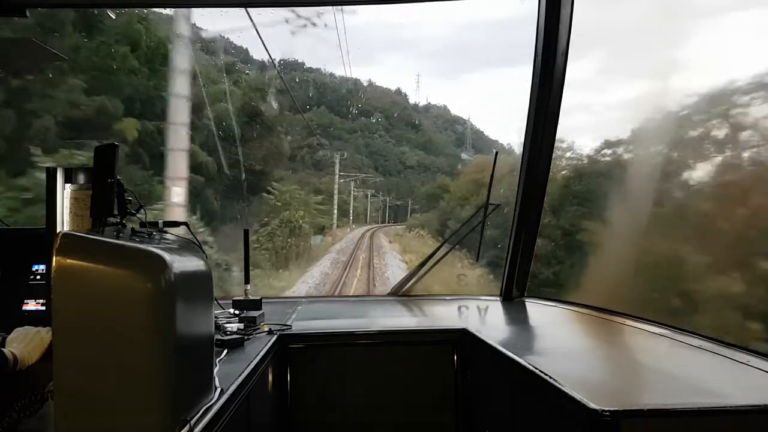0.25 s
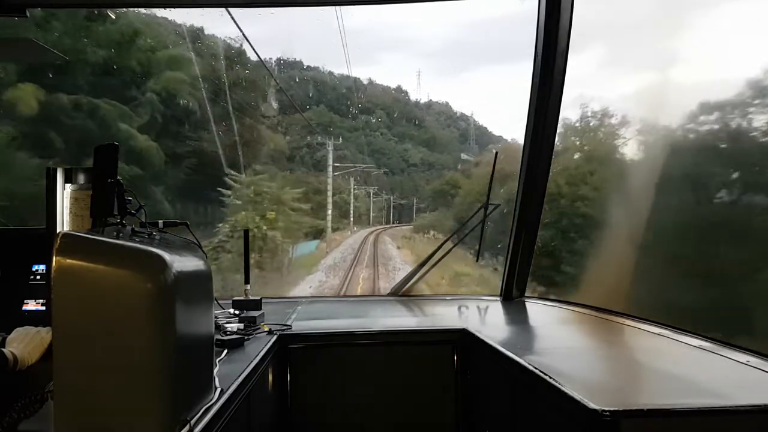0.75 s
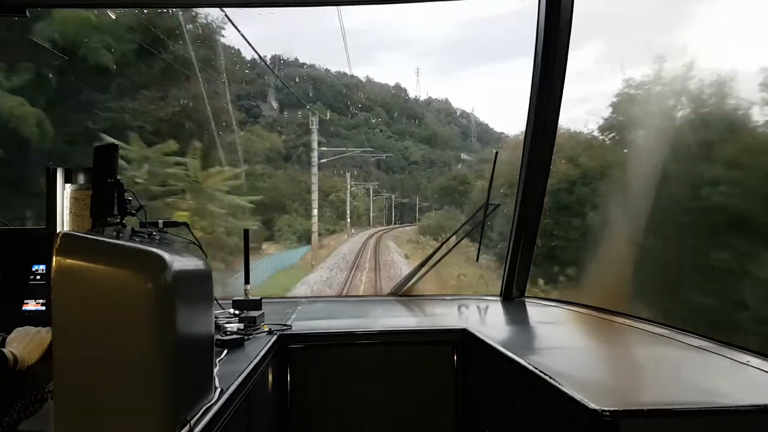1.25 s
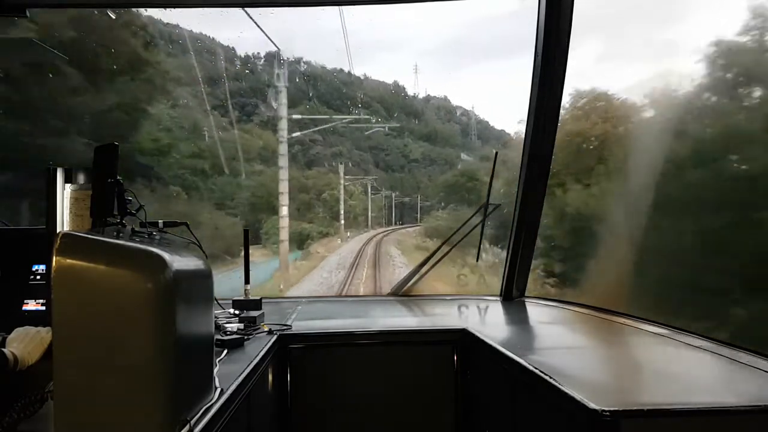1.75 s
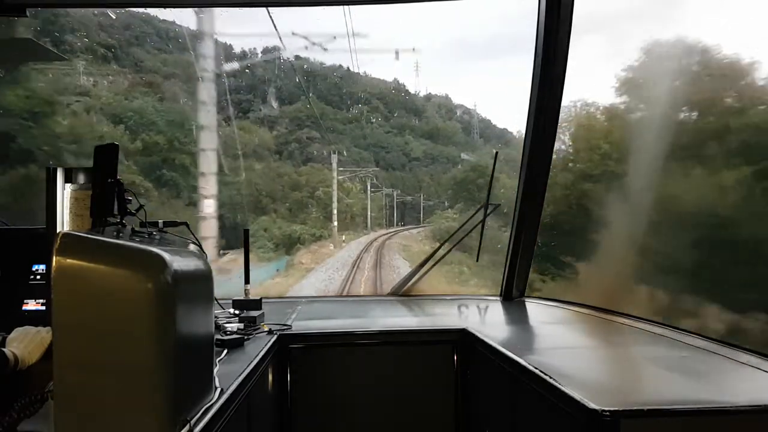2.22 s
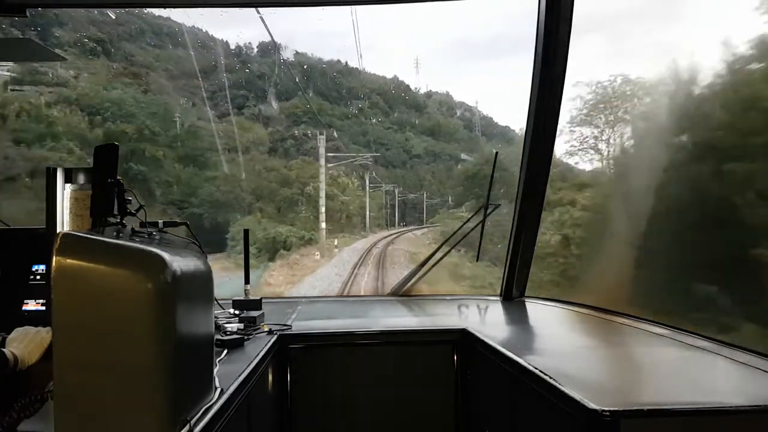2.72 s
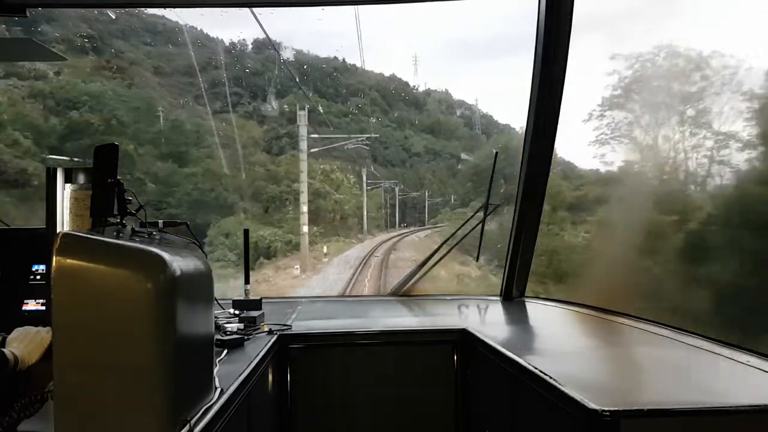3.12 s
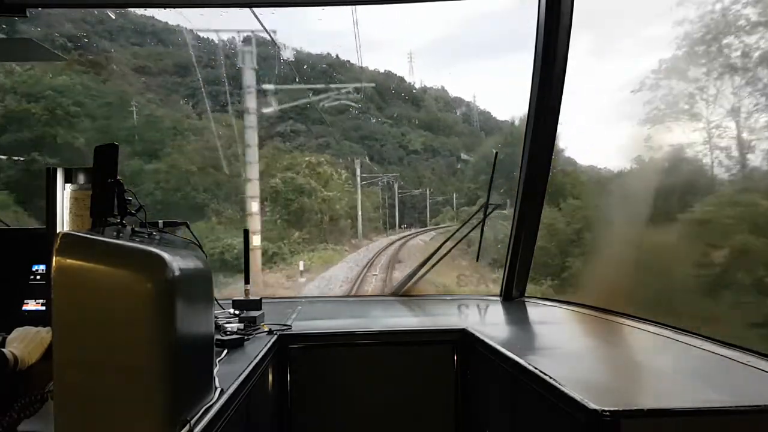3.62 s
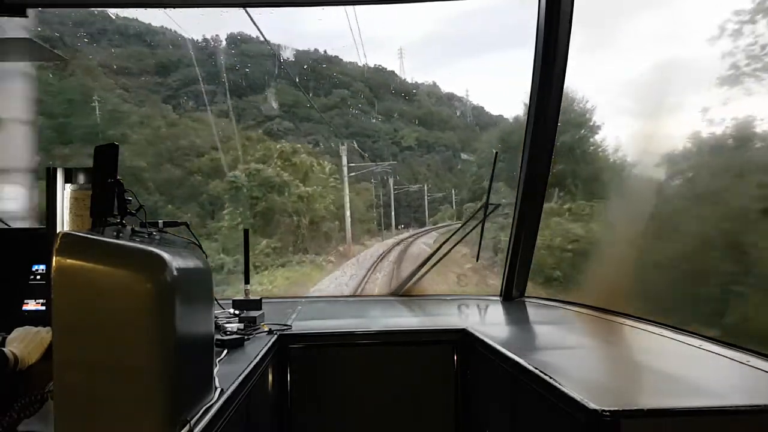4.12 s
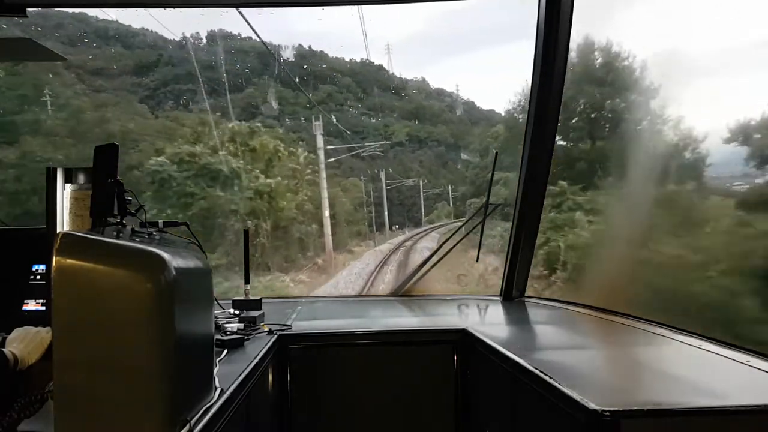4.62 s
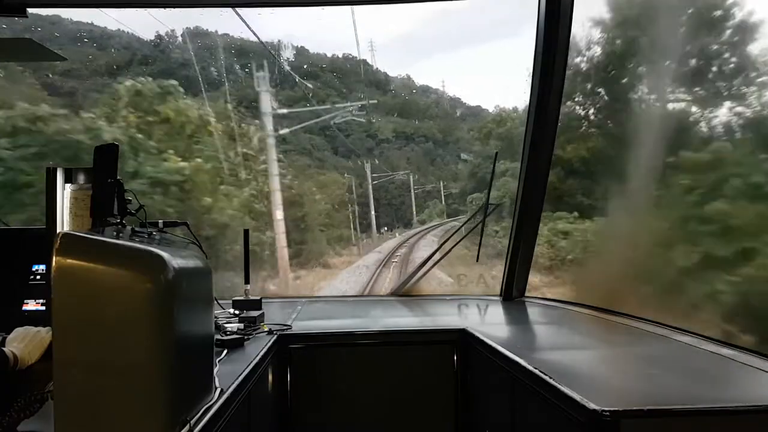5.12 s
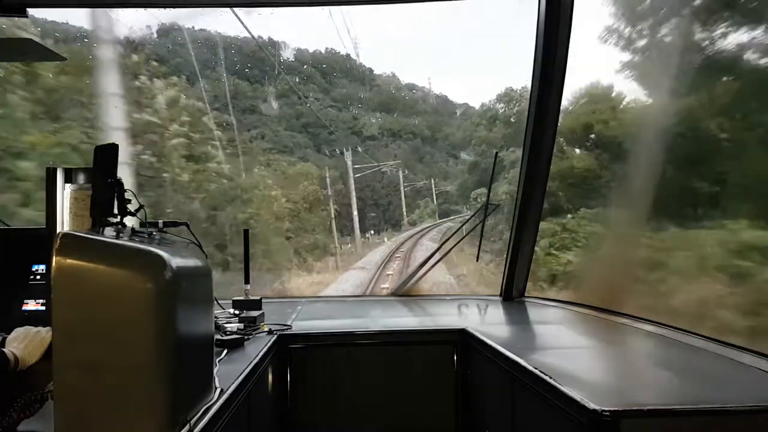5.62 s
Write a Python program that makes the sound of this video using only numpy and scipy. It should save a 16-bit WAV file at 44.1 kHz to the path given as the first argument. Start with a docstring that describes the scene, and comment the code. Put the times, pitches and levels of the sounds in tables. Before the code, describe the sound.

Steady low rumble of wheels on rail inside a moving train's cab, broken by small clicks, brief rattles and several heavy thuds.

```python
"""A low rumble and a rush of air fill the front car of an electric train at speed, under a thin whine.
Rail roughness drives the resonances of floor and wheels. Hiss puffs, loose parts clatter, a fitting
ticks, and wheelsets thud over joints, each blow ringing damped modes. Now and then a flange squeals;
once a wheel sings, and once the car body bottoms with a deep thump."""
import sys
import numpy as np
from scipy import signal
from scipy.fft import rfft, irfft, next_fast_len
from scipy.io import wavfile
from scipy.ndimage import uniform_filter1d, map_coordinates

SR = 44100
rng = np.random.default_rng(int(sys.argv[2]) if len(sys.argv) > 2 else 0)


def transcribe(signal):
    """Save signal, clipped to [-1, 1], as a 16-bit WAV file at the path in sys.argv[1]."""
    frames = np.atleast_2d(signal).T
    limited = np.clip(frames, -1, 1)
    pcm = np.round(limited * 32767).astype(np.int16)
    wavfile.write(sys.argv[1], SR, pcm)


N = 258426


def amp(db):
    return 10 ** (np.asarray(db) / 20)

def unit(x):
    return x / np.sqrt(np.mean(x ** 2) + 1e-20)

def along(points, hz):
    """Interpolate (Hz, value) points on a log frequency axis."""
    f, v = np.transpose(points)
    return np.interp(np.log(hz + 1), np.log(f + 1), v)

def curves(rows):
    """Interpolate each column after the time to one value per sample."""
    s, *cols = np.transpose(rows)
    return [np.interp(np.arange(N) / SR, s, c) for c in cols]

def wobble(rate):
    """Smooth random modulation, rate knots a second."""
    return map_coordinates(rng.standard_normal(int(N * rate / SR) + 4), [np.arange(N) * rate / SR])

def filtered(x, response):
    """Linear filtering: the spectrum of x times a frequency response."""
    m = next_fast_len(x.shape[-1] + SR // 4)
    return irfft(rfft(x, m) * response(np.fft.rfftfreq(m, 1 / SR)), m)[..., :x.shape[-1]]

def resonance(table, f):
    """Magnitude response of damped resonators, summed in power."""
    return np.sqrt(sum(amp(db) ** 2 * (f * width) ** 2 / ((hz * hz - f * f) ** 2 + (f * width) ** 2)
                       for hz, width, db in table))

def add(out, s, sound):
    """Superpose a short sound at s seconds."""
    part = out[:, round(s * SR):][:, :sound.shape[-1]]
    part += sound[..., :part.shape[1]]

# Coherence of the sound field. Each row: frequency in Hz, left-right correlation.
COHERENCE = [(25, .96), (70, .93), (125, .92), (250, .78), (500, .42), (1000, .3), (2000, .35), (5000, .15),
             (12000, .18)]
def noise(gain, patchy_db):
    """Partly coherent stereo noise of rms 1, its gain patchy in time and frequency."""
    spectra = signal.stft(rng.standard_normal((2, N)), nperseg=1024)[2]
    patches = uniform_filter1d(rng.standard_normal(spectra.shape[1:]), size=5, axis=0)
    patches = unit(uniform_filter1d(patches, size=5, axis=1))
    pair = signal.istft(spectra * amp(patchy_db * patches), nperseg=1024)[1][:, :N]
    turn = lambda f: np.arccos(np.clip(along(COHERENCE, f), -1, 1)) / 2
    mid, side = filtered(pair, lambda f: gain(f) * [np.cos(turn(f)), np.sin(turn(f))])
    return unit(np.array([mid + side, mid - side]))

def puff(t, gain, rise, fall):
    """Grainy noise under a Gaussian envelope that peaks at t = 0."""
    grains = rng.standard_normal((2, len(t))) * amp(1.7 * wobble(204.5)[:len(t)])
    return unit(filtered(grains, gain)) * np.exp(-(t / np.where(t < 0, rise, fall)) ** 2)

def tones(tracks, waver_hz, flutter_db):
    """Tones randomly modulated in pitch and level, one harmonic per level column."""
    out, t = np.zeros(N), np.arange(N) / SR
    for rows in tracks:
        hz, *levels = curves(rows)
        phase = 2 * np.pi * np.cumsum(hz + waver_hz * wobble(27)) / SR
        gate = np.clip(np.minimum(t - rows[0][0], rows[-1][0] - t) / .01, 0, 1)
        for k, db in enumerate(levels, 1):
            out += np.sqrt(2) * gate * amp(db + flutter_db * wobble(29.7)) * np.sin(k * phase)
    return out

def notes(events, overtones_db=()):
    """Tone tracks with an envelope of attack, sagging hold and release."""
    envelope = [(0, -20), (.34, 0), (.68, -4.5), (1, -20)]  # (share of the length, dB)
    return [[(s + share * length, hz, db + dip, *(db + dip + over for over in overtones_db))
             for share, dip in envelope] for s, length, hz, db in events]


# Spectrum of the sway. Each row: frequency in Hz, relative density in dB.
SWAY_SPECTRUM = [(7.1, -54), (12, -2.5), (38, 5), (75, 5), (92, 2.5), (113, -10.5), (130, 0), (170, -13.5),
                 (290, -120)]
def body_sway():
    """Forced vibration: the shaken car body radiates a deep rumble."""
    return noise(lambda f: amp(along(SWAY_SPECTRUM, f)), patchy_db=-.5)

# Floor panel modes. Each row: frequency in Hz, bandwidth in Hz, gain in dB.
FLOOR_MODES = [(118.7, 22.5, 0.5), (189.6, 31, 1.5), (204.7, 31, -2.5), (270.5, 34, -3), (307.6, 59, -0.5),
               (148, 41, -7)]
def floor_drone(cutoff_hz=420):
    """Resonance: randomly driven floor panels drone at their modes."""
    return noise(lambda f: resonance(FLOOR_MODES, f) / (1 + (f / cutoff_hz) ** 4), patchy_db=2)

# Spectrum of rolling noise. Each row: frequency in Hz, relative density in dB.
ROLL_SPECTRUM = [(180, -41.5), (300, -12.5), (323, -10.5), (443, -10), (565, -5), (660, -10), (899, -13),
                 (949, -18.5), (1500, -23), (1950, -41), (3300, -120)]
# Wheel and rail modes. Each row: frequency in Hz, bandwidth in Hz, gain in dB.
WHEEL_MODES = [(429, 5.6, -1.5), (469.3, 4.3, 1.5), (566, 6.2, 1), (731, 4.3, 2), (884, 3.2, -0.5),
               (2055, 16, -16), (2560, 26, -27)]
def wheel_roll():
    """Rolling contact makes broadband noise and excites wheel and rail modes."""
    broad = noise(lambda f: amp(along(ROLL_SPECTRUM, f)), patchy_db=2.5)
    ringing = noise(lambda f: resonance(WHEEL_MODES, f), patchy_db=2)
    return broad + amp(-5.5) * ringing

# Spectrum of the passing air. Each row: frequency in Hz, relative density in dB.
AIR_SPECTRUM = [(500, -19), (900, -2), (1200, -8.5), (1500, -9.5), (2200, -15.5), (3300, -22.5),
                (3800, -27), (5500, -34.5), (8000, -42), (9000, -63.5), (10000, -73)]
def air_rush(roughness, start_db=-44, fall_db_per_s=.34):
    """Flow noise: air rushes past, fluttering and slowly easing."""
    db = start_db - fall_db_per_s * np.arange(N) / SR + .5 * roughness + wobble(18)
    return amp(db) * noise(lambda f: amp(along(AIR_SPECTRUM, f)), patchy_db=1)

# Course of the rumble. Each row: time in seconds, then drone, roll and sway gains in dB.
RUMBLE_LEVELS = [(0, -38, -40.5, -36), (.22, -31, -38, -41), (.38, -30, -35, -31), (.5, -35.5, -40, -37),
                 (.96, -32.5, -38, -36.5), (1.28, -32, -36, -37), (1.7, -32.5, -39.5, -35.5),
                 (2.3, -34, -36, -37), (2.8, -31, -36.5, -37.5), (2.93, -25.5, -36, -37),
                 (3.04, -33.5, -40, -38), (3.75, -33, -38.5, -36.5), (3.97, -29, -38.5, -34.5),
                 (4.2, -31, -38, -38.5), (4.75, -30.5, -40.5, -45), (4.93, -25.5, -34.5, -30.5),
                 (5.08, -33, -42, -34.5), (5.5, -30.5, -40, -39), (5.86, -31, -37.5, -34.5)]
def running_noise():
    """Amplitude modulation: one roughness curve varies drone, roll and air above the sway."""
    drone_db, roll_db, sway_db = curves(RUMBLE_LEVELS)
    roughness = wobble(7)
    sway = amp(sway_db) * body_sway()
    drone = amp(drone_db + .19 * roughness) * floor_drone()
    roll = amp(roll_db + .9 * roughness) * wheel_roll()
    return sway + drone + roll + air_rush(roughness)

# Two successive glides. Each row of each: time in seconds, frequency in Hz, level in dB.
WHINE_GLIDES = [
    [(0, 11800, -92), (1, 11660, -92), (2.2, 11660, -92)],
    [(2.38, 12000, -92), (2.55, 11780, -92), (4, 11560, -92), (5, 11460, -92), (5.86, 11500, -92)],
]
def whine():
    """Frequency modulation: a faint treble tone wavers and drifts."""
    return tones(WHINE_GLIDES, waver_hz=12, flutter_db=1.5)

# Puffs of hiss. Each row: peak time in seconds, level in dB, fall in seconds, centre in Hz.
HISS_PUFFS = [(.178, -66, .02, 11000), (1.55, -64, 0.14, 6000), (1.58, -72.5, .11, 12400),
              (1.745, -65, .03, 6500), (1.949, -60, 0.056, 5000), (2.17, -63, 0.041, 6250),
              (4.92, -80.5, 0.065, 12400)]
def swishes():
    """Band-limited noise swells and fades in soft treble puffs."""
    out, t = np.zeros((2, N)), np.arange(-SR // 6, SR // 4) / SR
    for s, db, fall, centre_hz in HISS_PUFFS:
        band = lambda f: amp(-np.where(f < centre_hz, 6, 14) * np.log2(f / centre_hz + 1e-3) ** 2)
        add(out, s + t[0], amp(db) * puff(t, band, rise=.7 * fall, fall=fall))
    return out

# Rattles. Each row: peak time in seconds, level in dB, fall in seconds, tilt in dB per octave.
RATTLES = [(.27, -45.5, .032, 4), (1.9, -36.5, 0.081, -1), (2.71, -37, 0.017, -2), (3.288, -55, .015, 3),
           (4.825, -39.5, 0.08, 3.2), (4.892, -37, 0.12, 5.5)]
def clatter(cutoff_hz=6040):
    """Dense impacts of shaken loose parts merge into noise, coloured like the air but tilted."""
    out, t = np.zeros((2, N)), np.arange(-SR // 6, SR // 4) / SR
    for s, db, fall, tilt in RATTLES:
        colour = lambda f: amp(along(AIR_SPECTRUM, f) + tilt * np.log2(f + 1)) / (1 + (f / cutoff_hz) ** 2)
        add(out, s + t[0], amp(db) * puff(t, colour, rise=.014, fall=fall))
    return out

# Modes of the fitting and of its panel. Each row: frequency in Hz, level in dB, T60 in seconds.
FITTING_MODES = [(2650, 0, .027), (3170, -8, .028), (3430, -6, .035), (2374, -8, .035), (4370, -19, .03),
                 (4705, -19, .03)]
PANEL_MODES = [(1424, 15, 0.072), (1580, -4.5, 0.072), (1764, 10.5, 0.1)]
# Spectrum of a tap's crack. Each row: frequency in Hz, gain in dB.
CRACK_SPECTRUM = [(700, -37.5), (1400, -2.5), (3000, 4), (6000, -11), (8500, -16), (10000, -57),
                  (12000, -37), (16000, -43.5)]
# Taps. Each row: start in seconds, gain in dB, hardness, panel gain in dB, left minus right in dB.
TAPS = [(1.4087, -26, -5, -17, -2), (1.598, -33, -14, -17.5, 5), (1.721, -27, -2.5, -16, -1),
        (1.8178, -41.5, -7, -18, -4), (2.798, -27.5, 0.5, -12, 1.5), (3.4465, -27, -14, -14, 0),
        (3.917, -33.5, -13.5, -16, -3), (4.0079, -31.5, -0.5, -11.5, -1), (4.776, -32, -10.5, -16, -3),
        (5.0418, -28, -13, -18, 1)]
def fitting_ticks(tail_db=-15.5, tail_t60=.15, panel_rise_s=.0035):
    """Impact excitation rings fitting and panel; harder taps add upper modes and crack."""
    out, t = np.zeros((2, N)), np.arange(SR // 6) / SR

    def ring(modes, upper_db):
        return sum(amp(db + upper_db * (k > 0) + rng.standard_normal() - 60 * t / t60)
                   * np.sin(2 * np.pi * hz * t) for k, (hz, db, t60) in enumerate(modes))

    main_band = lambda f: resonance([(FITTING_MODES[0][0], 200, 0)], f) ** 3
    for s, db, hardness, panel_db, pan_db in TAPS:
        # The cab scatters the crack and prolongs the fitting's main mode.
        burst = (1 - np.exp(-t / .0005)) * (amp(-60 * t / .03) + amp(-9 - 60 * t / .12))
        crack = filtered(rng.standard_normal((2, len(t))) * burst, lambda f: amp(along(CRACK_SPECTRUM, f)))
        tail = unit(filtered(rng.standard_normal((2, len(t))), main_band))
        tail *= amp(tail_db - 60 * t / tail_t60)
        metal = (ring(FITTING_MODES, .7 * hardness) + tail) * (1 - np.exp(-t / .0006))
        panel = amp(panel_db) * ring(PANEL_MODES, 0) * (1 - np.exp(-t / panel_rise_s)) ** 2
        tap = metal + panel + amp(1.2 * hardness + 1) * crack
        add(out, s, amp(db) * tap * amp([[pan_db / 2], [-pan_db / 2]]))
    return out

# Car body modes. Each row: frequency in Hz, level in dB.
BODY_MODES = [(118, -6), (155, -2.5), (195, -1), (230, -1.5), (285, -2.5), (330, -3), (420, -0.5),
              (490, -1), (570, -3.5)]
# Blows at rail joints. Each row: peak time in seconds, gain in dB, centre in Hz, T60 in seconds.
JOINT_BLOWS = [(1.555, -22.5, 176, 0.13), (1.885, -24, 278, 0.036), (2.696, -24, 174, 0.077),
               (2.891, -28, 195, 0.13), (2.935, -23, 191, 0.16), (2.979, -36, 206, 0.097),
               (3.824, -12.5, 202, 0.069), (3.852, -15, 114, .25), (3.884, -29.5, 565, 0.29),
               (3.897, -17, 243, 0.099), (3.919, -16, 219, 0.12), (3.971, -26, 217, 0.1),
               (4.055, -26, 192, 0.1), (4.822, -12, 297, 0.057), (4.857, -20, 252, 0.03),
               (4.912, -14.5, 282, 0.039), (4.934, -15, 284, 0.055), (5.858, -11.5, 223, .2)]
def joint_thuds(rise_s=.018):
    """Vibration isolation: the suspension softens each blow, so modes near its centre swell, then die."""
    out, t = np.zeros((2, N)), np.arange(SR // 3) / SR
    swell = np.sin(np.pi / 2 * np.clip(t / rise_s, 0, 1)) ** 2
    decay_time = np.hypot(np.maximum(t - rise_s, 0), .02) - .02  # rounds off the peak
    # Every blow also wakes a later, weaker, higher and shorter group of modes.
    uppers = [(s + .013, db - 10.5, hz * 1.635, t60 * .64) for s, db, hz, t60 in JOINT_BLOWS]
    for s, db, centre_hz, t60 in JOINT_BLOWS + uppers:
        ring = 0
        for hz, level in BODY_MODES:
            cycles = hz * t + rng.random() + rng.normal(0, .068, (2, 1))
            ring += amp(level - 75 * np.log2(hz / centre_hz) ** 2) * np.sin(2 * np.pi * cycles)
        add(out, s - rise_s, amp(db - 60 * decay_time / t60) * swell * ring)
    return out

# Squeals. Each row: start in seconds, length in seconds, frequency in Hz, top level in dB.
SQUEALS = [(1.955, 0.097, 5455, -60.5), (2.03, 0.063, 5455, -64), (2.085, .1, 5455, -72),
           (4.405, 0.095, 5466, -58), (4.49, .12, 5466, -77), (4.98, .1, 5500, -68)]
def flange_squeal():
    """Friction-excited vibration: a flange sounds a high tone with a weak octave."""
    return tones(notes(SQUEALS, overtones_db=[-22]), waver_hz=9, flutter_db=2.5)

# The wheel's note. Each row: start in seconds, length in seconds, frequency in Hz, top level in dB.
WHEEL_NOTES = [(2.975, 0.19, 2060, -52.5)]
def wheel_song():
    """Resonance of a single wheel mode gives a brief, nearly pure tone."""
    return tones(notes(WHEEL_NOTES), waver_hz=4, flutter_db=1.2)

# The deep thump. Each row: start in seconds, gain in dB, frequency in Hz, T60 in seconds.
LURCHES = [(4.868, -7.5, 44.2, 0.21)]
def body_lurch(rise_s=.007):
    """Damped free vibration: the car body bottoms and rings at one low frequency."""
    out, t = np.zeros((2, N)), np.arange(SR // 3) / SR
    for s, db, hz, t60 in LURCHES:
        envelope = amp(db - 60 * t / t60) * (1 - np.exp(-t / rise_s))
        add(out, s, envelope * np.sin(2 * np.pi * hz * t))
    return out

def scene():
    """Superposition: the pressures of all sources add inside the car."""
    return (running_noise() + whine() + swishes() + clatter() + fitting_ticks() + joint_thuds()
            + flange_squeal() + wheel_song() + body_lurch())

# Level difference between the ports. Each row: frequency in Hz, left minus right in dB.
PORT_BALANCE = [(25, 2), (60, .2), (250, -.4), (600, -1.6), (2000, -1.5), (8000, 0)]
# Phase difference between the ports. Each row: frequency in Hz, lead of the left in radians.
PORT_PHASE = [(20, 0), (600, -.2), (950, .6), (1210, 2.4), (1460, 2.1), (2070, 5.3), (2580, 5.4),
              (3100, 6.8), (6000, 6.3)]
# Microphone self-noise. Each row: frequency in Hz, relative density in dB.
SELF_NOISE = [(6000, -30), (8800, -8), (10500, -6), (12000, -1), (15800, 0), (16500, -60)]
def record(dry, top_hz=15750):
    """Spaced pickup: two ports a hand apart differ in level and phase, add hiss and limit the band."""
    half = np.array([[.5], [-.5]])
    response = lambda f: amp(half * along(PORT_BALANCE, f)) * np.exp(1j * half * along(PORT_PHASE, f))
    hiss = amp(-77.8) * noise(lambda f: amp(along(SELF_NOISE, f)), patchy_db=.5)
    return filtered(filtered(dry, response) + hiss, lambda f: f < top_hz)


dry = scene()
out = record(dry)
transcribe(out)
```